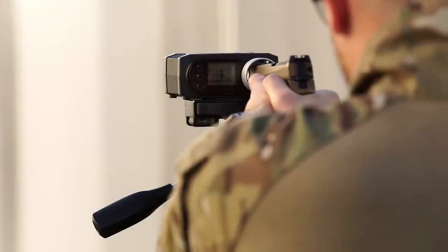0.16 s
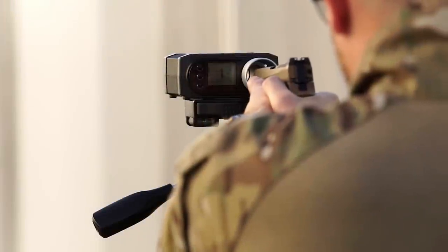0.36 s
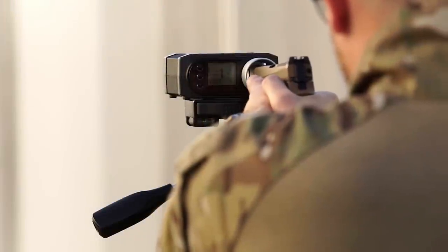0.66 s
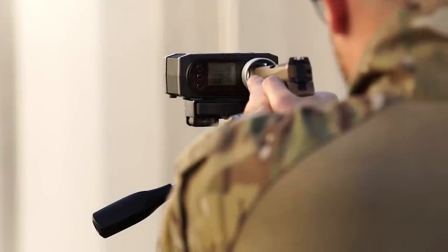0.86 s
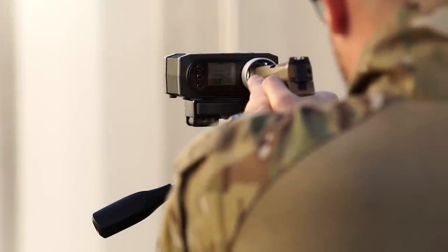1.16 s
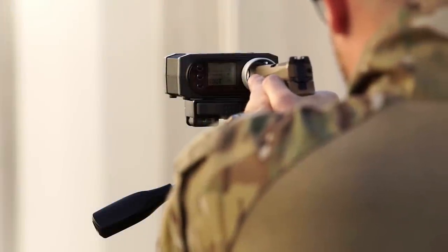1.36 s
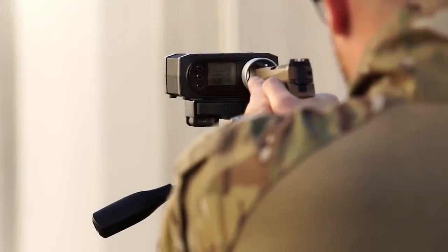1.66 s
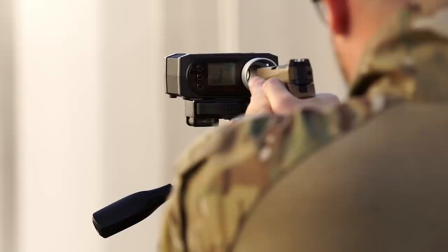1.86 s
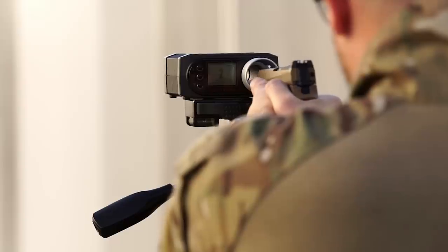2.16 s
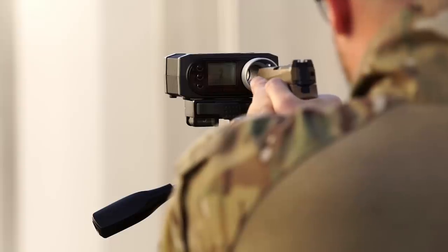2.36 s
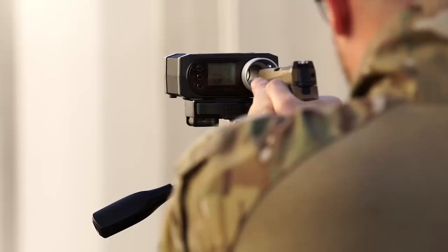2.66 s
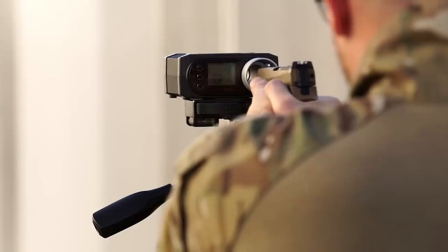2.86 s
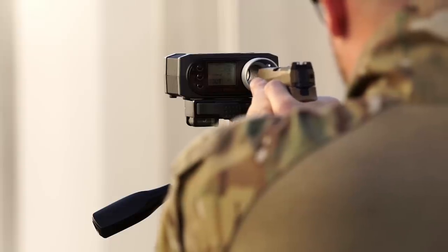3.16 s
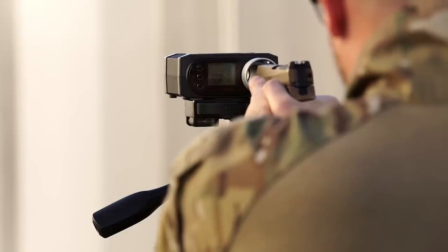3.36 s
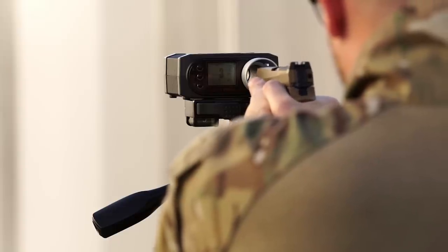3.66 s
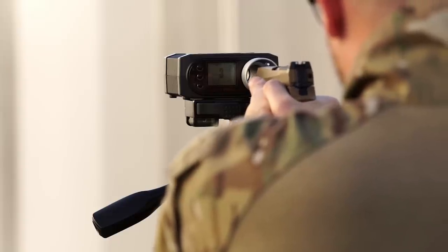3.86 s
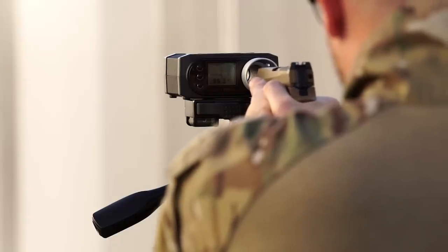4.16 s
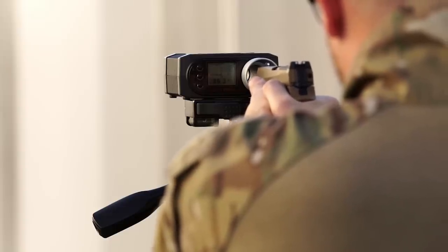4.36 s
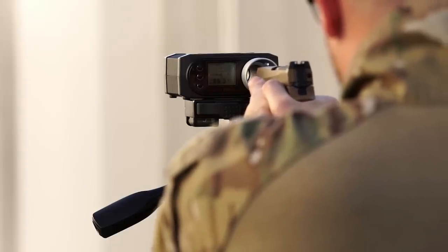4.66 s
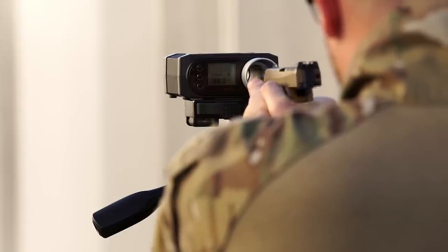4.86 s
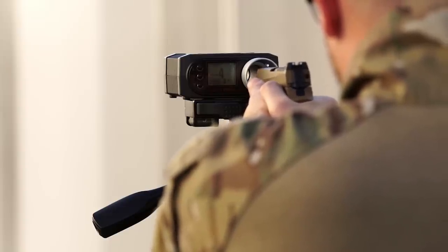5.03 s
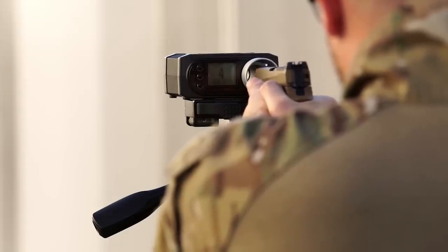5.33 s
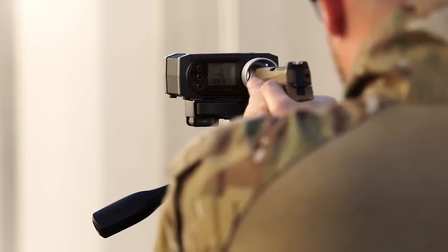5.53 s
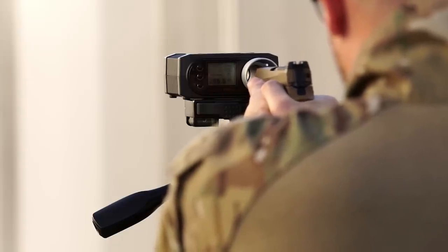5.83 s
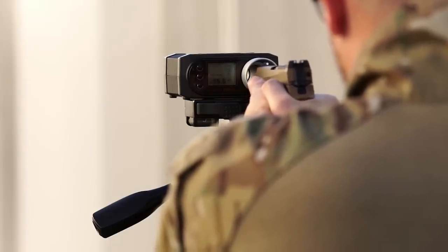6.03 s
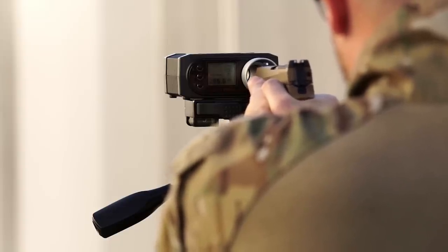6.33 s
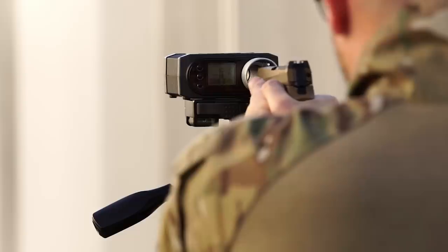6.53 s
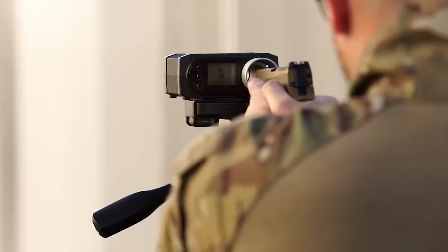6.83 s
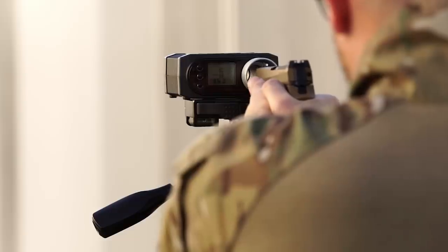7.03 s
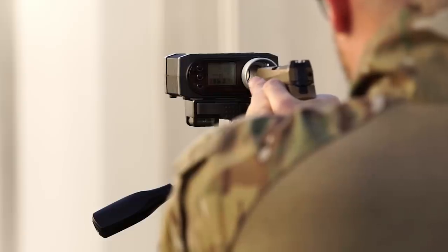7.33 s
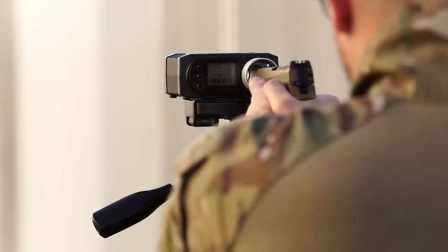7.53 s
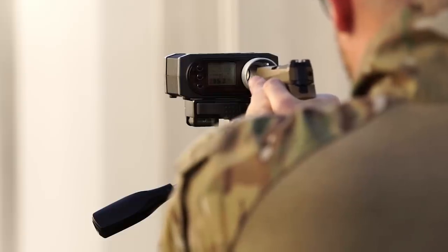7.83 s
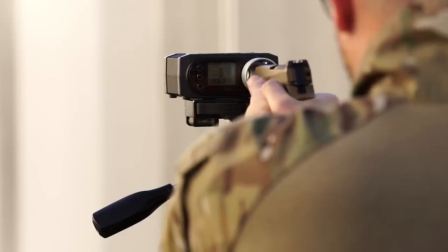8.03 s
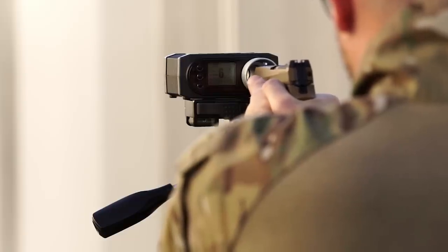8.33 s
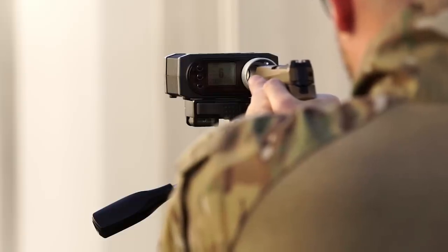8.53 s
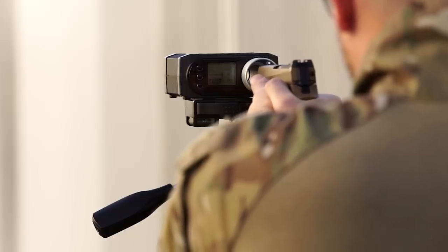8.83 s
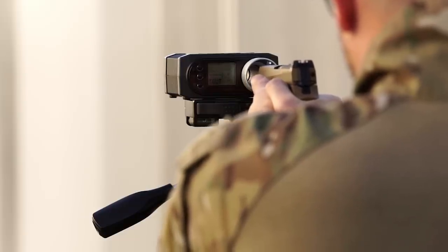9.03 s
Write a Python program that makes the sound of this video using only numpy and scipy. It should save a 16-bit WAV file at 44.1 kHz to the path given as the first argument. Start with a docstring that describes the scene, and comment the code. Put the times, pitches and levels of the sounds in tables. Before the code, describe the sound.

Six sharp airsoft pistol pops about a second and a half apart indoors, each with a metallic slide clack, gas hiss and pellet strike.

```python
"""A gas blowback airsoft pistol fires six shots through a chronograph indoors.
Each shot chains coloured noise bursts, swinging air and ringing modes: hammer, muzzle pop, venting gas,
slide hitting its stop, feeding a pellet and slamming shut. Three pellets strike hard and rebound loudly, the
others land softly; the trigger clicks as it resets. Outside, two harmonics make a far engine, likely a motorbike,
that pulls through two gears and cruises over a low rumble of filtered noise; a faint whistle passes once."""
import sys
import numpy as np
from scipy import signal
from scipy.fft import rfft, irfft
from scipy.io import wavfile
from scipy.ndimage import uniform_filter1d

SR = 44100
rng = np.random.default_rng(int(sys.argv[2]) if len(sys.argv) > 2 else 0)


def int16_out(signal):
    """Quantize to a 16-bit WAV file."""
    q = np.round(np.clip(np.atleast_2d(signal).T, -1, 1) * 32767)
    wavfile.write(sys.argv[1], SR, q.astype(np.int16))


N = 405279
EVENT_T = np.arange(SR // 2) / SR  # s, time within one event
LEAD_S = 256 / SR  # room for the swell ahead of an event's peak

# Traffic rumble through the walls: frequency_hz, relative_density_db (per Hz)
RUMBLE_COLOUR = [(12, -41.5), (20, -12.5), (43, -9), (70, 0.5), (107, -6.5), (222, -4.5), (337, -10),
                 (485, -10), (558, -13), (718, -11), (2140, -35.5), (11400, -47.5), (16000, -65.5)]
# Traffic loudness: time_s, rms_level_db
RUMBLE_LEVEL = [(0, -63), (4.4, -62.5), (5.8, -61), (7.2, -65), (9.19, -65)]
# Engine speed, with a gear change after the first pull: time_s, firing_hz (before a slight drift)
ENGINE_PITCH = [(0, 219), (.3, 228.8), (1.0, 260.8), (2.3, 290), (2.45, 248), (3.3, 270.7), (4.4, 279.6),
                (5.6, 221.9), (7.05, 213.6), (7.7, 212.7), (9.19, 237.6)]
# Engine loudness before walls, waver and throttle: time_s, first_harmonic_db, second_harmonic_db
ENGINE_LEVEL = [(0, -71, -63.5), (1.1, -61, -61.5), (3.1, -66, -65), (4.8, -82, -84.5), (6, -60, -85),
                (7.1, -68, -67), (8.2, -70.5, -80.5), (9.19, -66.5, -80.5)]
# What the walls let through of the engine: frequency_hz, gain_db
WALL_GAIN = [(215, -3.5), (245, -3.5), (275, 0.5), (525, -1.5), (555, -9), (590, -16)]

# Shots: start_s (muzzle pop), gas_push_db, slide_travel_s (until the slide hits its back stop)
SHOT_CYCLES = [(0.0943, -43, 0.023), (1.834, -46, 0.024), (3.402, -17, 0.02), (4.9448, -47.5, 0.024),
               (6.473, -15.5, .0241), (8.0064, -53.5, 0.023)]
# Stop impact, also the hammer: frequency_hz, relative_density_db (per Hz)
STOP_COLOUR = [(150, -25.5), (480, -10.5), (820, -8.5), (1400, -6.5), (2050, -1.5), (3200, -2),
               (4200, -1.5), (5500, -12), (7300, -7.5), (9000, -20), (11500, -20), (14000, -13.5),
               (15500, -20)]
# Muzzle pop: frequency_hz, relative_density_db (per Hz)
POP_COLOUR = [(50, -8), (240, -2), (600, -5), (810, -6.5), (1020, 6), (1220, -2.5), (1450, 0.5), (1950, -2),
              (2200, -9.5), (3100, -5), (3650, -4.5), (6000, -1.5), (9000, -14.5), (15000, -8)]
# Spent gas swirling round the microphone: frequency_hz, relative_density_db (per Hz)
BUFFET_COLOUR = [(20, -1), (140, 0), (260, -10.5), (600, -27), (4000, -63)]
# Gas venting from the breech: frequency_hz, relative_density_db (per Hz)
VENT_COLOUR = [(50, -9), (220, -4.5), (520, -7.5), (740, -11), (1400, -7), (2300, -11.5), (3200, -13.5),
               (4050, 0), (4900, -9.5), (7200, -11.5), (9000, -18), (11200, -25), (13000, -21),
               (15500, -22.5)]
# Recoil spring ringing: frequency_hz, relative_level_db, t60_s
SPRING_RING = [(598, -4, .35), (980, -4, .35), (2035, -3, .7), (3015, -8, .35), (5850, -7, .4)]
# Slide scraping and slamming: frequency_hz, relative_density_db (per Hz)
SLIDE_COLOUR = [(100, -25.5), (350, -27), (500, -18.5), (820, -19.5), (1450, -4.5), (2400, -10), (3100, -3),
                (4050, 0.5), (5200, -13), (7400, -8.5), (8600, -15.5), (15000, -20)]
# Slide ringing: frequency_hz, relative_level_db, t60_s
SLIDE_RING = [(490, -16.5, 0.035), (967, -3.5, .06), (1250, -5, 0.03), (1407, 0, .045), (1620, -3, 0.024),
              (2025, -5.5, 0.09), (2940, -10, 0.052), (2975, -7, 0.038), (3530, -7, 0.03),
              (3550, -6, 0.035), (3890, 1, 0.018), (4320, -7, .035), (5030, -9, 0.065), (6060, -17, 0.06),
              (7500, -9, .035), (9400, -15, 0.072)]
# Trigger, grip and magazine clicks: frequency_hz, relative_density_db (per Hz)
CLICK_COLOUR = [(300, -22.5), (1000, -1), (1800, -2), (2700, -7), (3800, -2), (5500, -6), (8000, -4),
                (15000, -17)]
# Tail of the room: frequency_hz, relative_gain_db
ROOM_GAIN = [(100, -5), (500, -4), (1000, 5.5), (2000, -1), (4000, -5), (5800, -1), (7500, -2), (14000, -1)]

# Pellets reaching the target: strike_s, tick_level_db, thud_level_db (before the trims in pellets)
STRIKES = [(0.2292, -58, -34), (1.9671, -58, -31), (3.523, -23, -19), (5.0652, -24.5, -23.5),
           (6.5918, -24, -24.5), (8.1372, -50, -34)]
# The same rattle after every strike: delay_s, level_db (relative to its tick)
REBOUND_TICKS = [(0.0344, -14.5), (0.04, -9.5), (.088, -20.5)]
# Hard pellet tick: frequency_hz, relative_density_db (per Hz)
TICK_COLOUR = [(200, -19), (950, -1.5), (1300, -19.5), (2050, -2.5), (2500, -4), (3100, 6), (4600, 4.5),
               (7500, -2.5), (15000, -17)]
# Target ringing: frequency_hz, relative_level_db, t60_s
TARGET_RING = [(647, -4.5, 0.056), (748.5, 1, 0.055), (832, -8, 0.15), (1042, -5.5, 0.088)]
# Hollow knock of the target: frequency_hz, relative_density_db (per Hz)
THUD_COLOUR = [(150, -20), (450, -16.5), (750, -3), (1100, -5.5), (2000, -7), (5000, -21), (15000, -27)]

# Trigger resets: start_s
TRIGGER_RESETS = [0.3148, 2.054, 3.641, 8.251]
# Late reflection: frequency_hz, relative_gain_db
SLAP_COLOUR = [(200, 3.5), (1200, -3), (5500, -11.5), (7500, -10), (15000, -21)]
# The hand shifts on the grip: start_s, level_db, brightness_db_per_octave
GRIP_SHIFTS = [(6.099, -47.5, 6.5), (6.1029, -51.5, 3), (6.1507, -64, 5.5)]
# Soft knock: frequency_hz, relative_density_db (per Hz)
KNOCK_COLOUR = [(200, -9.5), (900, 2.5), (2000, 0.5), (3000, -10.5), (5000, -25), (15000, -42)]

# Timing shared by every shot, in seconds
VENT_AFTER_S, RETURN_S, FEED_BEFORE_S, LOCK_AFTER_S = .0083, .044, .012, .0035


def amp(db):
    """Decibels to gain."""
    return 10 ** (np.asarray(db) / 20)


def evened(x):
    """Scales to rms 1."""
    return x / np.sqrt(np.mean(x ** 2) + 1e-20)


def read(points, hz):
    """Reads a table on a log-frequency axis."""
    f, value = np.transpose(points)
    return np.interp(np.log(hz + 1), np.log(f + 1), value)


def add(mix, s, sound):
    """Mixes in a sound whose peak falls at time s."""
    part = mix[round((s - LEAD_S) * SR):][:len(sound)]
    part += sound[:len(part)]


def colour(x, points, tilt_db=0, size=2048):
    """Causal (minimum-phase) filter of unit energy with the given spectrum, tilted per octave."""
    hz = abs(np.fft.fftfreq(size, 1 / SR))
    gain_db = read(points, hz) + tilt_db * np.log2(1 + hz / 1024)
    log_spectrum = signal.hilbert(np.log(amp(gain_db))).conj()
    taps = np.fft.ifft(np.exp(log_spectrum)).real[:size // 2]
    return signal.fftconvolve(x, taps / np.linalg.norm(taps))[:len(x)]


def envelope(rise, t60):
    """Swells with time constant rise, then dies away by 60 dB in t60 (both in s)."""
    t = EVENT_T - LEAD_S
    swell = np.minimum(t, 0) / rise
    decay = np.log(1000) * np.maximum(t, 0) / t60
    return np.exp(swell - decay)


def burst(points, rise, t60, tilt_db=0):
    """A short rush of noise, coloured by the part that it shakes."""
    shape = envelope(rise, t60)
    noise = evened(rng.standard_normal(len(EVENT_T)) * shape)
    noise = noise * np.sqrt(np.mean(shape ** 2))  # same energy for every draw
    return colour(noise, points, tilt_db)


def ring(modes):
    """Damped modes that start at random phases, so each strike differs a little."""
    out = 0
    for hz, db, t60 in modes:
        tone = np.sin(2 * np.pi * (hz * EVENT_T + rng.random()))
        out = out + amp(db) * envelope(.0003, t60) * tone
    return out


def rumble():
    """Traffic through the walls: steady noise shaped in frequency, then ridden slowly in level."""
    t, hz = np.arange(N) / SR, np.fft.rfftfreq(N, 1 / SR)
    spectrum = rfft(rng.standard_normal(N)) * amp(read(RUMBLE_COLOUR, hz))
    return amp(np.interp(t, *np.transpose(RUMBLE_LEVEL))) * evened(irfft(spectrum, N))


def engine(drift_hz=9, waver_db=3.0, pitch_drift=.007, shift_dip_db=-10):
    """The two lowest harmonics of the firing rate drift and waver behind the walls."""
    t, hz = np.arange(N) / SR, np.fft.rfftfreq(N, 1 / SR)
    slow_spectra = rfft(rng.standard_normal((3, N))) * np.exp(-(hz / drift_hz) ** 2)
    drift = evened(irfft(slow_spectra, N))  # one for pitch, one for each harmonic's level
    pitch = np.interp(t, *np.transpose(ENGINE_PITCH))
    angle = 2 * np.pi * np.cumsum(pitch * (1 + pitch_drift * drift[0])) / SR
    s, *levels = np.transpose(ENGINE_LEVEL)
    out = np.zeros(N)
    for k, db in enumerate(levels, 1):
        level_db = np.interp(t, s, db) + read(WALL_GAIN, k * pitch) + waver_db * drift[k]
        out += amp(level_db) * np.sin(k * angle)
    # the throttle is shut while the revs fall faster than 100 Hz per second
    falling = 1. * (np.gradient(pitch, t) < -100)
    shifting = uniform_filter1d(falling, SR // 10)
    return amp(shift_dip_db * shifting) * out


def muzzle_tone(hz, width, lag):
    """Air in the barrel and chronograph tube swings for a few cycles in a bell-shaped envelope."""
    t = EVENT_T - LEAD_S - lag
    return np.exp(-(t / width) ** 2) * np.sin(2 * np.pi * hz * t)


def gas_push(length, lag):
    """A slow pressure wave of spent gas: a push and a longer suck."""
    u = np.maximum(EVENT_T - LEAD_S - lag, 0) / length
    return np.e * u * (2 - u) * np.exp(-u)


def gas():
    """The hammer falls on the valve, the muzzle pops, then gas rushes from the opening breech."""
    out = np.zeros(N)
    for s, push_db, _ in SHOT_CYCLES:
        add(out, s - .005, amp(-38) * burst(STOP_COLOUR, rise=.0012, t60=0.027))  # hammer
        add(out, s, amp(-1) * burst(POP_COLOUR, rise=0.00067, t60=0.01))
        add(out, s, amp(-4.46) * muzzle_tone(hz=544, width=.0018, lag=.0008))
        add(out, s, amp(push_db) * gas_push(length=0.0022, lag=0.002))
        # spent gas swirls round the microphone
        add(out, s + 0.0069, amp(push_db - 7) * burst(BUFFET_COLOUR, rise=0.0024, t60=0.058))
        vent = s + VENT_AFTER_S
        add(out, vent, amp(-5.5) * burst(VENT_COLOUR, rise=0.0017, t60=0.014))
        add(out, vent, amp(-24) * muzzle_tone(hz=290, width=.003, lag=.002))  # the air swings again, lower
        add(out, vent, amp(-50) * ring(SPRING_RING))  # the recoil spring is kicked
    return out


def near_echoes(x, t60):
    """Quick, sparse reflections from the shooter, the tripod and the nearest wall."""
    hits = rng.standard_normal(len(EVENT_T)) * (rng.random(len(EVENT_T)) < 3000 / SR)  # 3000 per second
    taps = hits * (EVENT_T > .004) * amp(-60 * EVENT_T / t60)
    return signal.fftconvolve(x, taps / np.linalg.norm(taps))[:N]


def room(x, t60, dull_hz, swell):
    """A diffuse tail of decaying noise; curtains and air swallow the treble sooner."""
    hz, t, z = signal.stft(rng.standard_normal(SR), SR, nperseg=256)
    fall_db = 60 * t / t60 * (1 + (hz[:, None] / dull_hz) ** 2)  # falls twice as fast at dull_hz
    z = z * amp(read(ROOM_GAIN, hz)[:, None] - fall_db) * (1 - np.exp(-t / swell))
    tail = signal.istft(z, SR, nperseg=256)[1]
    return signal.fftconvolve(x, tail / np.linalg.norm(tail))[:N]


def linger(x):
    """The faint, slow end of the room's decay, without its top treble."""
    edge = signal.butter(8, 5500, fs=SR, output="sos")
    return amp(-41) * signal.sosfilt(edge, room(x, t60=1.0, dull_hz=20000, swell=.03))


def slide():
    """The slide hits its back stop; the spring returns it to scrape, feed a pellet and slam shut."""
    out = np.zeros(N)
    for s, _, travel in SHOT_CYCLES:
        back = s + travel
        shut = back + RETURN_S
        feed = shut - FEED_BEFORE_S
        add(out, back, amp(-14.5) * burst(STOP_COLOUR, rise=0.00028, t60=0.019))
        add(out, back, amp(-39.5) * ring(SLIDE_RING))
        add(out, feed, amp(-41) * burst(SLIDE_COLOUR, rise=.012, t60=0.18))  # scraping along the rails
        # stripping a pellet from the magazine
        add(out, feed, amp(-32) * burst(CLICK_COLOUR, rise=0.00044, t60=0.045))
        add(out, shut, amp(-14.5) * burst(SLIDE_COLOUR, rise=0.00048, t60=0.018))
        # the barrel locks up just after
        add(out, shut + LOCK_AFTER_S, amp(-18) * burst(SLIDE_COLOUR, rise=0.00029, t60=0.026))
        add(out, shut, amp(-26.5) * ring(SLIDE_RING))
    return out


def pellets():
    """Hard ticks with their rebounds, and the hollow, ringing thud of the target."""
    ticks, thuds = np.zeros((2, N))
    for s, tick_db, thud_db in STRIKES:
        for delay, db in [(0.0016, 0)] + REBOUND_TICKS:
            add(ticks, s + delay, amp(tick_db + db) * burst(TICK_COLOUR, rise=.0003, t60=.03))
        add(thuds, s, amp(thud_db - 11) * ring(TARGET_RING))
        add(thuds, s, amp(thud_db - 11.5) * burst(THUD_COLOUR, rise=0.00079, t60=0.046))
    return ticks, thuds


def trigger():
    """Small dry noise clicks as the trigger springs back to its reset."""
    out = np.zeros(N)
    for s in TRIGGER_RESETS:
        add(out, s, amp(-45) * burst(CLICK_COLOUR, rise=0.0004, t60=0.016, tilt_db=-2.5))
    return out


def slap(x, delay_s=.268):
    """One late, dull and scattered reflection."""
    late = np.pad(x, (round(delay_s * SR), 0))[:N]
    return amp(-52.5) * colour(near_echoes(late, t60=0.067), SLAP_COLOUR)


def whistle(start_s=1, length_s=.22, from_hz=735, to_hz=790):
    """A faint tone far outside that swells, rises a little and fades."""
    u = np.clip((np.arange(N) / SR - start_s) / length_s, 0, 1)
    hz = from_hz + (to_hz - from_hz) * u
    return amp(-64) * np.sin(np.pi * u) ** 2 * np.sin(2 * np.pi * np.cumsum(hz) / SR)


def grip():
    """The hand shifts on the grip in short clicks of differing brightness."""
    out = np.zeros(N)
    for s, db, tilt_db in GRIP_SHIFTS:
        add(out, s, amp(db) * burst(CLICK_COLOUR, rise=0.00054, t60=0.0196, tilt_db=tilt_db))
    return out


def knock():
    """Something knocks softly once: a short, dull noise burst."""
    out = np.zeros(N)
    add(out, 7.6423, amp(-53.5) * burst(KNOCK_COLOUR, rise=.0006, t60=0.0238))
    return out


def scene():
    """The pistol is close and dry; the target is across the room and much wetter."""
    outside = rumble() + engine() + whistle()
    gun = gas() + slide() + trigger() + grip() + knock()
    ticks, thuds = pellets()
    tail = room(gun, t60=.66, dull_hz=13500, swell=.004)
    near = amp(-18.5) * near_echoes(gun, t60=0.11) + amp(-31) * tail
    near = near + slap(gun) + linger(gun)
    far = room(amp(-12) * ticks + amp(-20.5) * thuds, t60=0.74, dull_hz=19600, swell=0.002)
    return (gun + near + ticks + thuds + far + outside)[None]


def record(dry):
    """The pops overload the input softly towards a ceiling of 0.7; then the treble is band-limited."""
    limited = dry / (1 + (dry / .7) ** 4) ** (1 / 4)
    band_limit = signal.firwin(511, 15950, window=("kaiser", 9), fs=SR)
    return signal.oaconvolve(limited, band_limit[None], "same")


dry = scene()
out = record(dry)
int16_out(out)
```